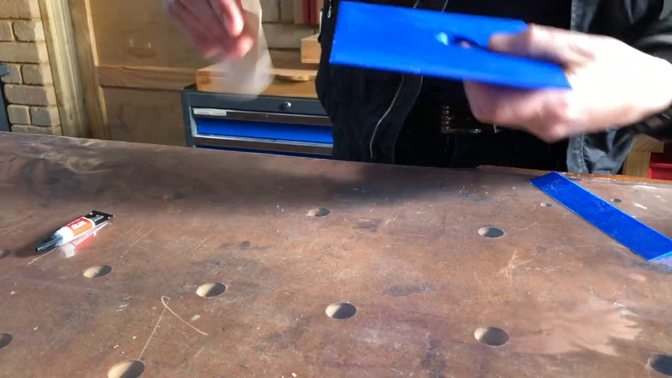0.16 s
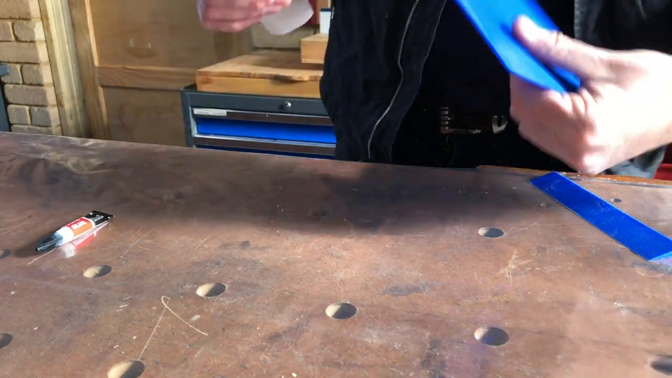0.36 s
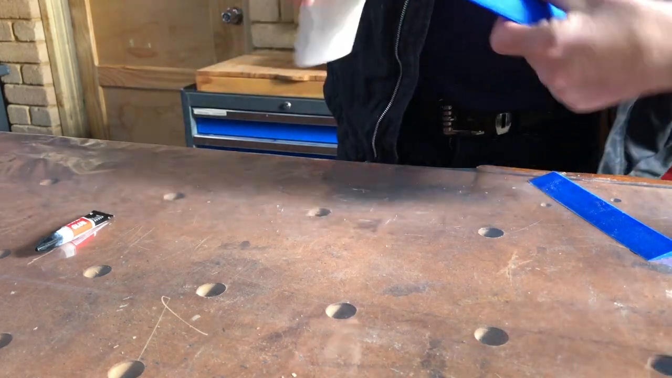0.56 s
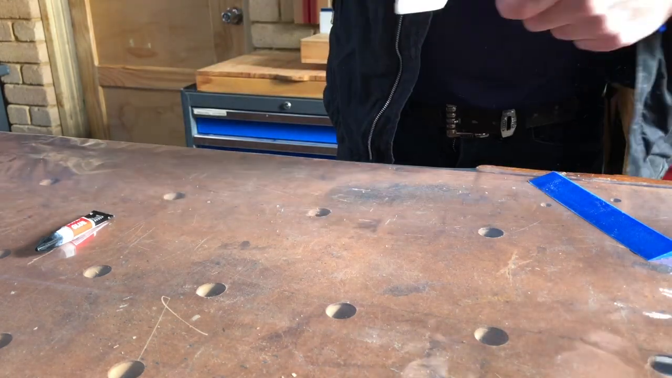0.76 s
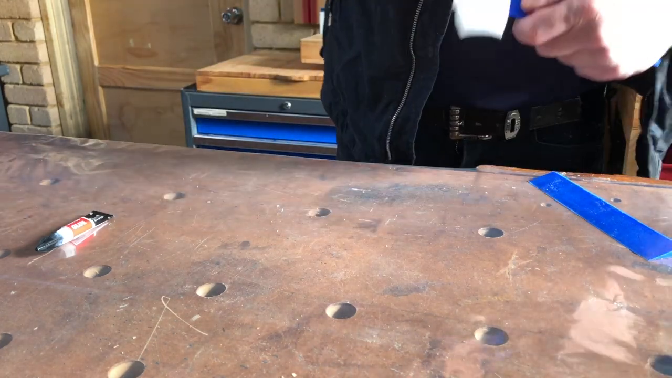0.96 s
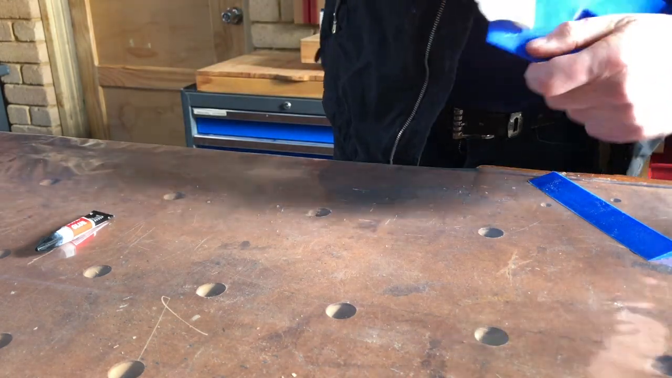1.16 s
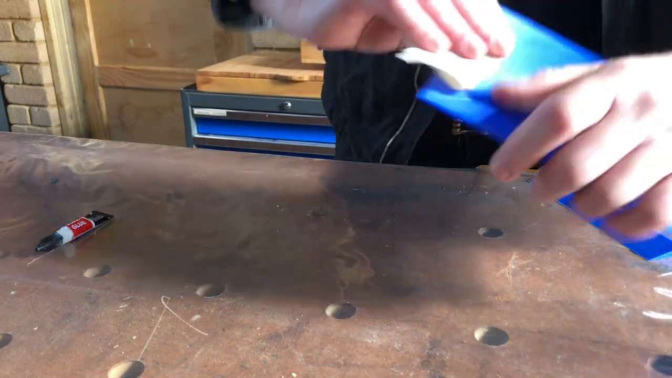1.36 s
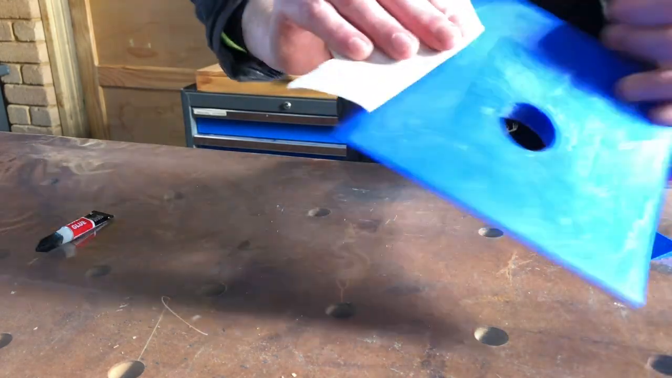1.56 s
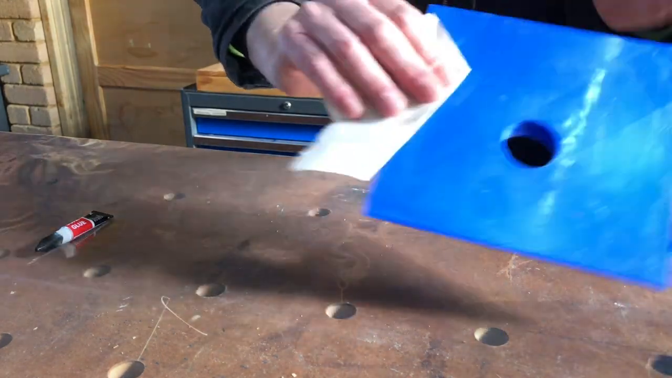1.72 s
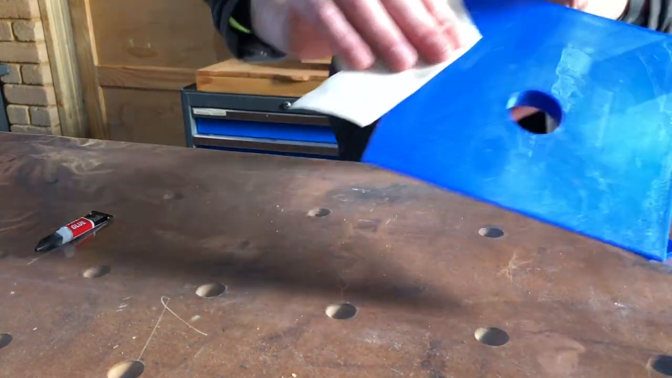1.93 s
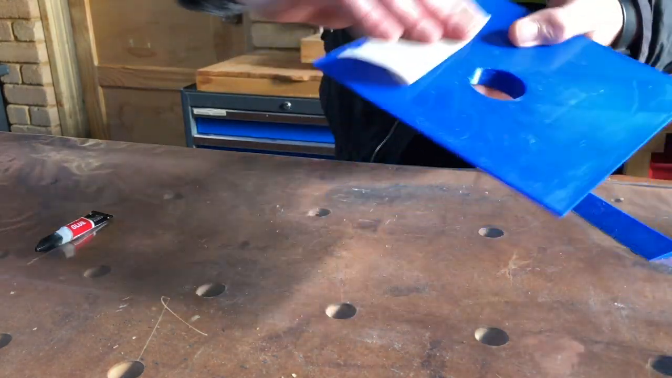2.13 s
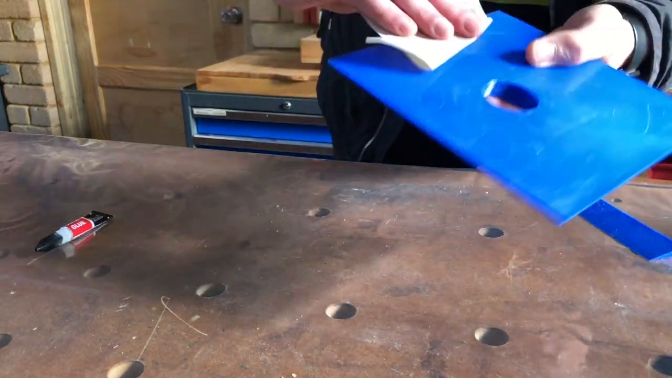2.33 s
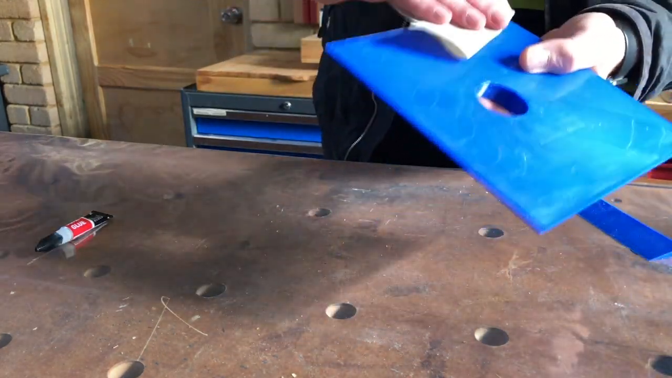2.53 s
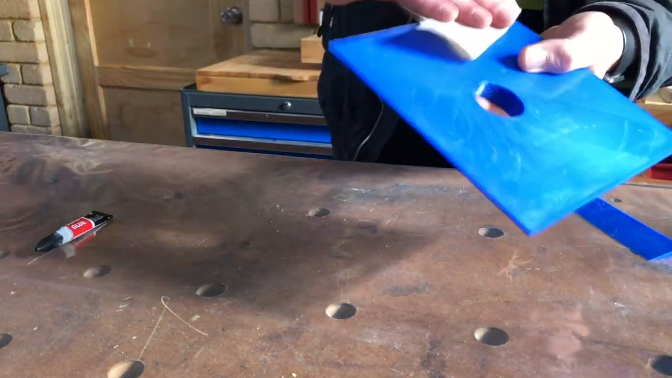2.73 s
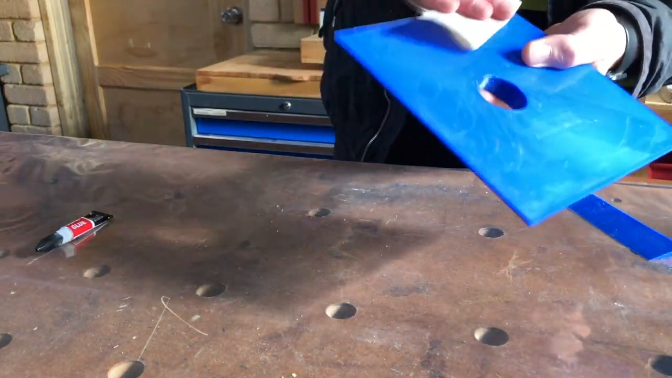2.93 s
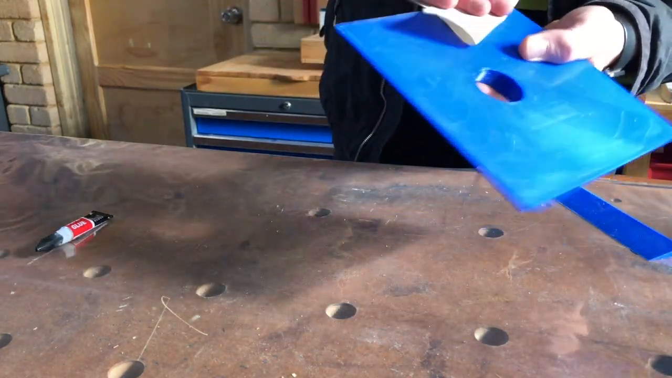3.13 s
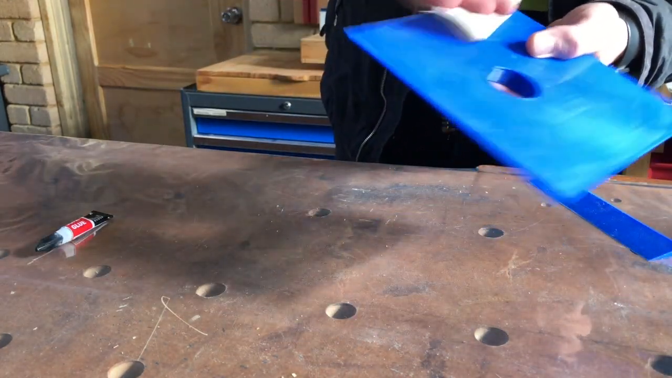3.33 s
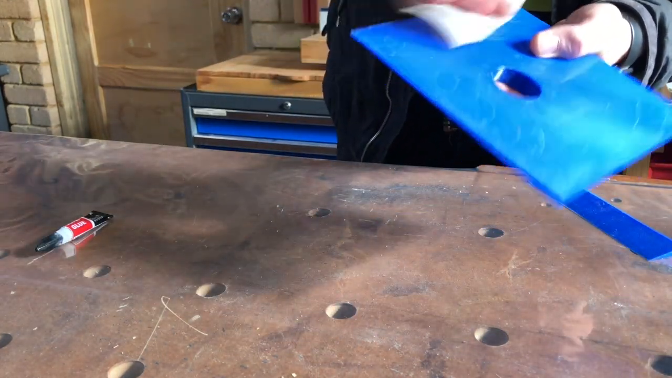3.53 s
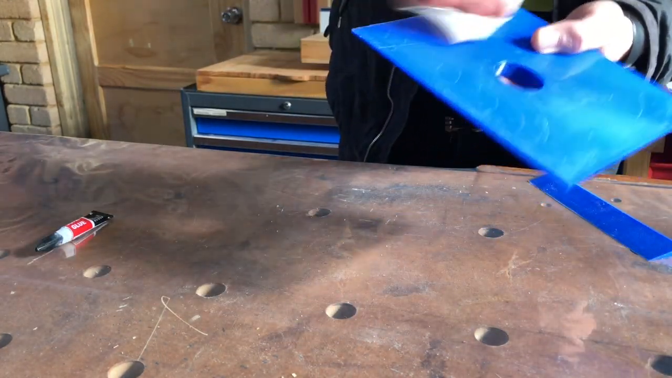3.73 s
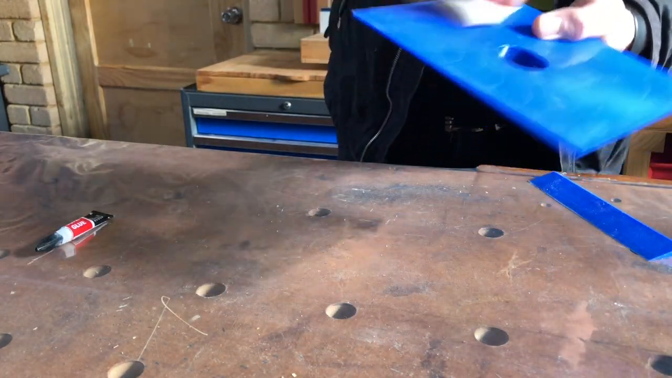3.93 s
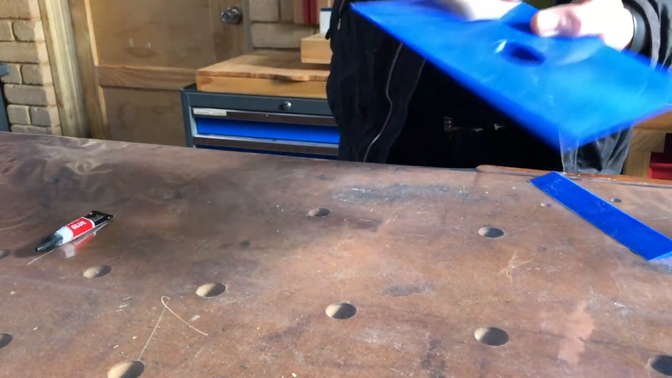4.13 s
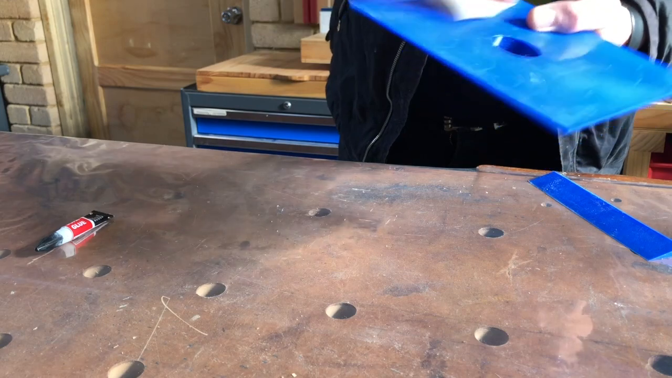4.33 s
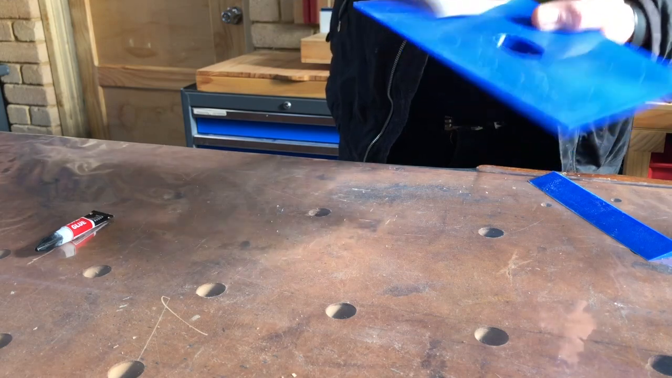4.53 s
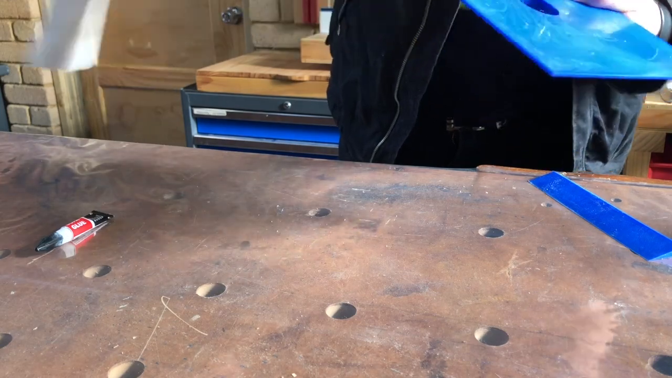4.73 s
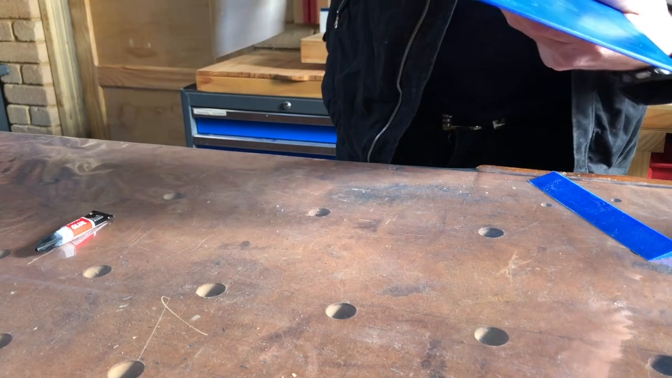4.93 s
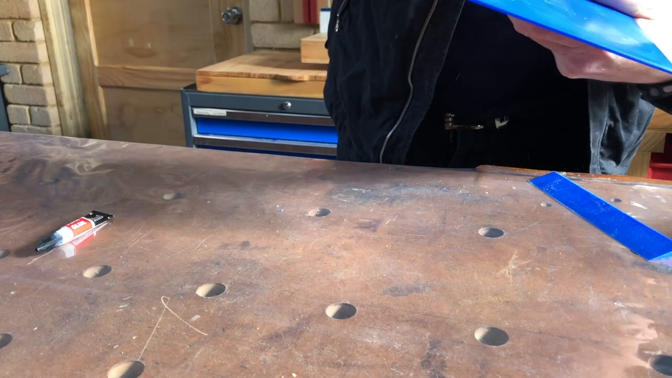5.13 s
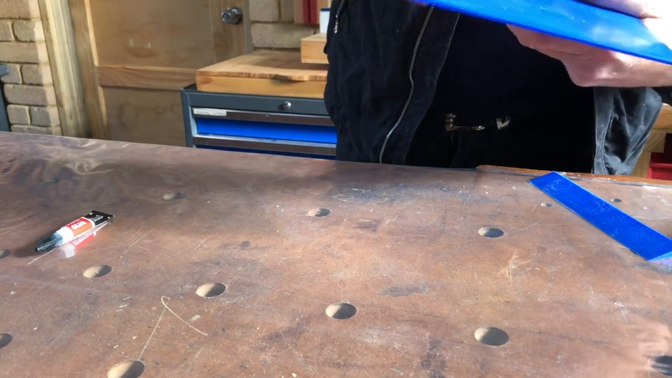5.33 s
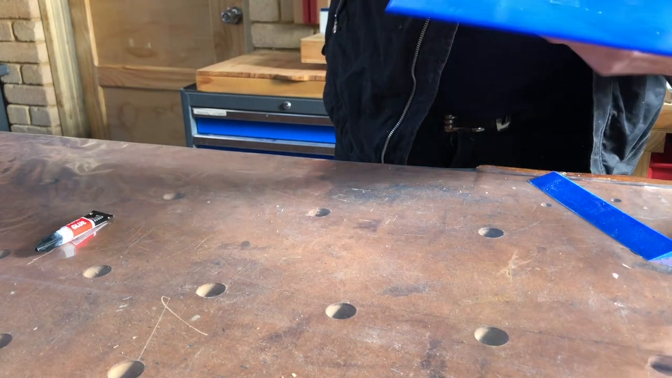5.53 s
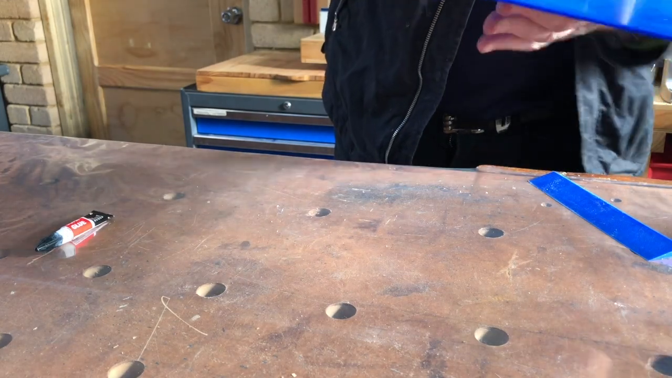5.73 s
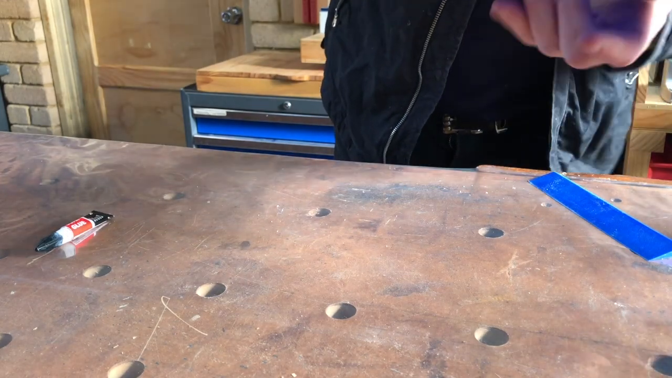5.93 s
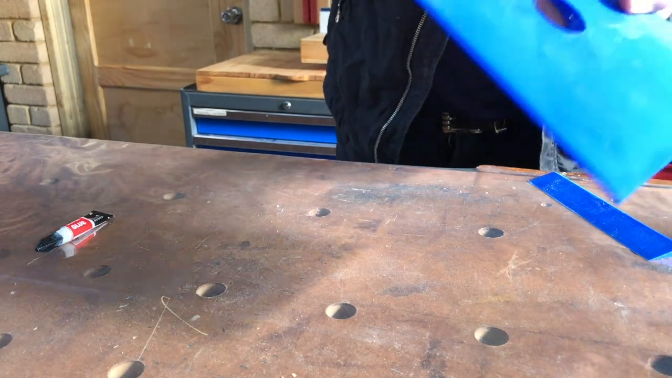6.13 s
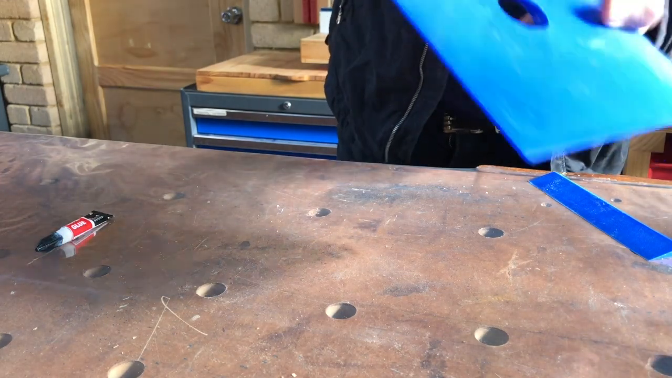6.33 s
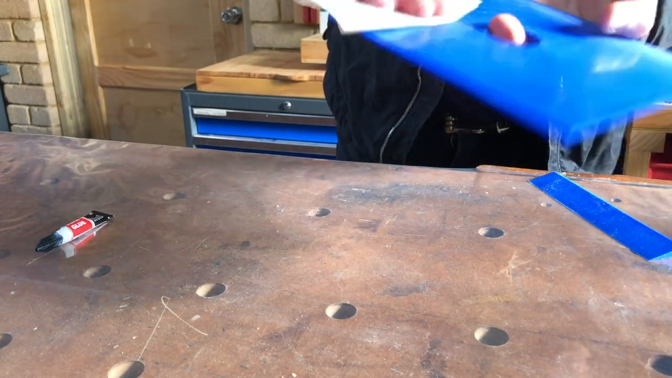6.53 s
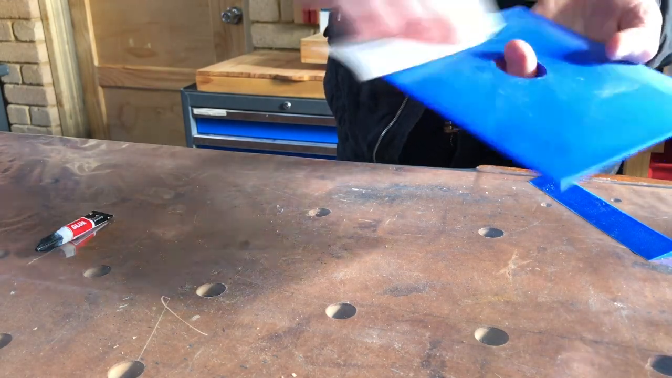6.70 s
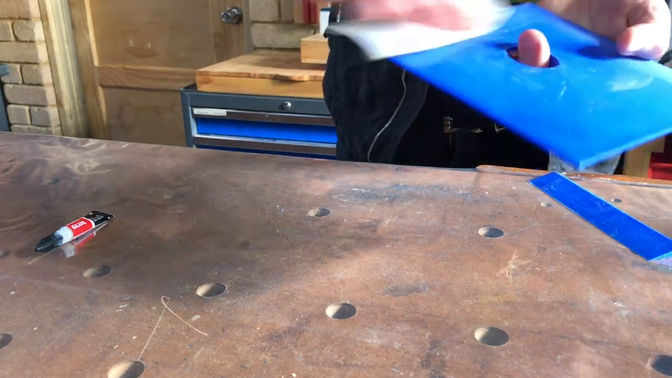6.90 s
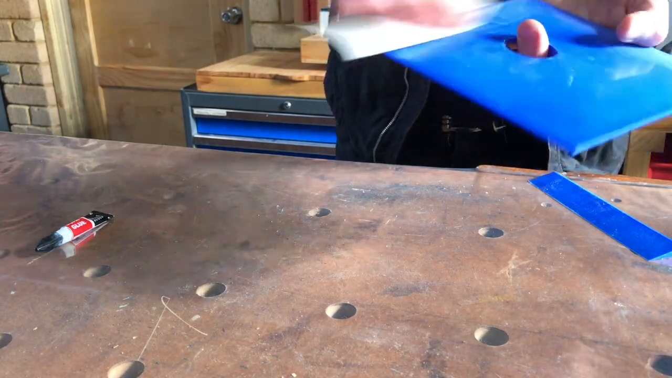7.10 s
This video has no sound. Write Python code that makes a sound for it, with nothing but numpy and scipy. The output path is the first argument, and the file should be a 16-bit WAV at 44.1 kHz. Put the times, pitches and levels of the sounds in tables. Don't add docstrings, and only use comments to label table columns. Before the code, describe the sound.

Sandpaper scrapes rapidly back and forth over a hard plastic plate, bright gritty hiss in quick strokes, with handling taps and pauses in a quiet workshop.

```python
import sys
import numpy as np
from scipy import signal
from scipy.fft import rfft, irfft
from scipy.io import wavfile
from scipy.ndimage import uniform_filter1d

SR = 44100
rng = np.random.default_rng(int(sys.argv[2]) if len(sys.argv) > 2 else 0)


def pcm_store(signal):
    levels = np.round(np.clip(np.atleast_2d(signal), -1, 1) * 32767)
    wavfile.write(sys.argv[1], SR, levels.astype(np.int16).T)


def field_ratio(decibels):
    return 10 ** (np.asarray(decibels, dtype=float) / 20)


N = 315756


def evened(x):
    return x / np.sqrt(np.mean(np.abs(x) ** 2) + 1e-20)


def drift(shape, size):
    return evened(uniform_filter1d(rng.standard_normal(shape), size=size))


def read(points, hz):
    f, value = np.transpose(points)
    return np.interp(np.log(hz + 1), np.log(f + 1), value)


def add(mix, s, sound):
    part = mix[round(s * SR):][:len(sound)]
    part += sound[:len(part)]


def highpass(x, order, hz):
    return signal.sosfilt(signal.butter(order, hz, "highpass", fs=SR, output="sos"), x)


def resonate(x, hz, width):
    turn = np.exp(2j * np.pi * np.cumsum(hz * np.ones(len(x))) / SR)
    r = np.exp(-np.pi * width / SR)
    return 2 * (turn * signal.lfilter([1 - r], [1, -r], x / turn + 1e-18)).real


def resonate_twice(x, hz, width):
    return resonate(resonate(x, hz, width), hz, width)


def colour(x, points, tilt_db=0.):
    hz = np.fft.rfftfreq(len(x), 1 / SR)
    gain = field_ratio(read(points, hz) + tilt_db * np.log2(hz / 5000 + 0.023))
    return evened(irfft(rfft(x) * gain, len(x)))


def grains(count, spread_db, clump_db):
    clumps = drift(count, 130)
    sizes = field_ratio(spread_db * rng.standard_normal(count) + clump_db * clumps)
    return evened(rng.standard_normal(count) * sizes)


# (frequency [Hz], level [dB], t60 [s])
PLATE = [(473, -4.5, 0.043), (577, -6.5, 0.047), (786, -4, 0.035), (910, -1, 0.051), (1380, -9.5, 0.017),
         (1687, -8.5, 0.087), (2124, -21, 0.047), (2700, -10.5, .02), (4320, -14, 0.006)]


def ring(x):
    modes = 0
    for hz, db, t60 in PLATE:
        width = np.log(1000) / np.pi / max(t60, .008)
        modes = modes + field_ratio(db) * resonate(x, hz, width)
    return evened(modes)


def fuzzy_bands(start, end, bands):
    slip = rng.standard_normal(round((end - start) * SR))
    sound = sum(field_ratio(db) * evened(resonate_twice(slip, hz, width)) for hz, width, db in bands)
    return start, sound * signal.windows.tukey(len(slip), .5)


def tap(row, shape):
    s, peak_db, hz, ring_db = row
    bright_db, t60, rise, snap, spread = shape
    t = np.arange(6000) / SR
    blow = rng.standard_normal(len(t)) * field_ratio(-60 * t / t60) * np.minimum(t / rise, 1) ** 2
    blow = blow + snap * (np.arange(len(t)) == round(rise * SR))
    thud = evened(resonate_twice(blow, hz, spread * hz))
    tick = evened(resonate_twice(blow, 6200, 10700))
    sound = thud + field_ratio(bright_db + 7.0) * tick + field_ratio(ring_db) * ring(blow)
    sound = highpass(sound, 2, hz / 4)
    return s, field_ratio(peak_db) * sound / np.abs(sound).max()


# (time [s], frequency [Hz], level [dB], second order level [dB])
MOTOR = [(0.0, 68.6, -71.5, -68), (0.24, 77.74, -64.5, -69), (0.3, 79.24, -74, -69.5),
         (0.74, 82.06, -70.5, -75.5), (1.17, 85.85, -62.5, -60), (1.56, 85.4, -72.5, -66),
         (2.27, 86.6, -62, -69.5), (2.41, 89.1, -72.5, -72.5), (4.09, 93.8, -75, -82),
         (4.25, 97.8, -76.5, -82), (4.46, 93.9, -79, -79), (4.93, 94.27, -75.5, -76),
         (5.06, 99, -66, -92.5), (5.14, 94.8, -74, -78), (6.38, 96.6, -66, -66.5),
         (6.62, 100, -88.5, -74.5), (6.82, 95.7, -73.5, -91), (7.16, 98.2, -73, -68)]


def motor():
    s, *columns = np.transpose(MOTOR)
    hz, first_db, second_db = (np.interp(np.arange(N) / SR, s, c) for c in columns)
    turns = np.cumsum(hz + 3.3 * drift(N, 3000)) / SR
    throb_db = 3 * evened(uniform_filter1d(drift((2, N), 3000), size=3000))
    first = field_ratio(first_db + throb_db[0]) * np.sin(2 * np.pi * turns)
    second = field_ratio(second_db - 2.0 + throb_db[1]) * np.sin(4 * np.pi * turns)
    return np.sqrt(2) * (first + second)


# (frequency [Hz], level [dB per Hz])
FLOOR = [(15, -69), (25, -45.5), (61, -10.5), (108, -3), (212, -9), (363, -10), (439, -9.5), (531, -11.5),
         (6050, -28), (14000, -30.5), (16000, -57.5)]


def room_floor():
    return [field_ratio(-70) * colour(noise, FLOOR) for noise in rng.standard_normal((2, N))]


def mottled(x, patch_db):
    z = signal.stft(x, nperseg=256, noverlap=192)[2]
    field = uniform_filter1d(rng.standard_normal(z.shape), size=5, axis=0)
    field = evened(uniform_filter1d(field, size=14, axis=1))
    return signal.istft(z * field_ratio(patch_db * field), nperseg=256, noverlap=192)[1][:len(x)]


# (frequency [Hz], level [dB per Hz])
GRIT = [(530, -53), (900, -55), (1410, -12), (1810, -13.5), (2470, -12), (2790, -5.5), (4250, -4.5),
        (5100, -1.5), (6180, -3), (7580, -0.5), (9090, -1), (11000, 3), (12400, -2), (14700, -1),
        (16000, -1)]


def grit_hiss(grit, tilt_db, speed):
    hiss = highpass(mottled(colour(grit, GRIT, tilt_db), patch_db=2.5), 4, 1350)
    dull = resonate(hiss, 2500, 5000)
    return dull + (hiss - dull) * speed / np.mean(speed)


def ridge_whistle(grit, speed, top_hz, ends):
    hz = top_hz * speed * (1 + 0.038 * drift(len(grit), 350))
    width = .55 * top_hz * ends ** 2
    first = evened(resonate_twice(grit, hz, width))
    octave = evened(resonate_twice(grit, 2 * hz, 2 * width))
    return 1.2 * (first + field_ratio(-8) * octave) * speed ** 2.5


# (frequency [Hz], level [dB per Hz])
DRUM = [(90, -46.5), (200, -22.5), (450, -14), (700, -8.5), (1000, -9.5), (1300, 0.5), (1800, -3),
        (2600, -7), (4000, -43.5)]


def stroke(row, grip, tilt_db, drum_db, ends):
    start, end, level_db, top_hz, top = row
    push_db, whistle_db, bite, release = grip
    u = np.linspace(0, 1, round((end - start) * SR))
    turn = np.where((u < top) == (push_db > 0), ends + .3 * (1 - ends), ends)
    swing = np.sin(np.pi / 2 * np.where(u < top, u / top, (1 - u) / (1 - top)))
    speed = turn + (1 - turn) * swing
    grit = grains(len(u), spread_db=1.0, clump_db=0.6)
    hiss = grit_hiss(grit, tilt_db, speed)
    catch_db = 3.5 * drift(len(u), 350) + 2.0 * np.tanh(push_db) * (u - 1.0)
    whistle = ridge_whistle(grit, speed, top_hz, ends) * field_ratio(whistle_db + catch_db)
    drumming = field_ratio(drum_db - 16.5) * colour(grit, DRUM)
    biting = np.sin(np.pi / 2 * np.minimum(u / bite, 1))
    easing = np.sin(np.pi / 2 * np.minimum((1 - u) / release, 1))
    pressure = field_ratio(level_db + 0.5 + push_db / 2 * np.tanh(3.5 * (u - .48)))
    return start, pressure * (biting * easing) ** 0.72 * (hiss + whistle + drumming)


# (time [s], brightness [dB per octave])
SETTLE = [(0, -4.5), (.87, -7.5), (1, -3), (1.3, -4), (1.62, -7.5), (2.2, -5), (2.45, -3), (2.85, -1.6),
          (3.3, -1.09), (3.5, -3), (3.8, -1.41), (4.6, -1.5), (6.41, -5), (6.63, -1), (7.1, -0.3)]


def settle(s):
    tilt_db = np.interp(s, *np.transpose(SETTLE))
    return tilt_db, -2 * tilt_db


# (start [s], end [s], level [dB], ridges crossed at top speed [Hz], moment of top speed [0-1])
EARLIER_BOUT = [
    (0, .1, -32.5, 4300, 0.62),
]
TRIES = [
    (.818, 0.917, -34.5, 3500, 0.55),
    (0.944, 1.064, -29.5, 3700, 0.7),
    (1.083, 1.184, -30.5, 3900, 0.17),
    (1.218, 1.253, -35.5, 3100, 0.35),
    (1.272, 1.343, -56, 2810, 0.28),
    (1.585, 1.652, -32.5, 3150, 0.1),
    (2.007, 2.15, -33.5, 3200, .4),
    (2.15, 2.267, -33.5, 2900, 0.32),
    (6.36, 6.456, -31, 4220, 0.51),
]
LONG_BOUT = [(2.294, 2.371, -28.5, 1730, 0.47), (2.392, 2.473, -29, 1600, 0.51),
             (2.489, 2.576, -27.5, 2680, 0.5), (2.596, 2.686, -27.5, 2548, 0.45),
             (2.691, 2.78, -27.5, 2606, 0.55), (2.798, 2.893, -28, 3182, 0.62),
             (2.892, 2.98, -27, 3127, 0.56), (2.999, 3.083, -28, 3038, 0.3),
             (3.088, 3.171, -27.5, 3204, 0.59), (3.186, 3.267, -27.5, 3450, 0.36),
             (3.278, 3.357, -26, 3570, 0.57), (3.375, 3.464, -29.5, 3660, 0.46),
             (3.466, 3.551, -30, 3545, 0.6), (3.561, 3.658, -29.5, 3440, 0.43),
             (3.658, 3.752, -27.5, 3650, 0.48), (3.764, 3.856, -28.5, 3530, 0.46),
             (3.856, 3.956, -28, 4061, 0.5), (3.962, 4.052, -27.5, 3640, 0.51),
             (4.06, 4.157, -28.5, 4234, 0.56), (4.165, 4.252, -28, 3829, 0.55),
             (4.261, 4.346, -27, 4046, 0.58), (4.36, 4.452, -28, 3700, .4), (4.451, 4.541, -28, 3535, 0.64),
             (4.554, 4.648, -27, 4850, 0.72)]
LAST_BOUT = [
    (6.477, 6.598, -30, 2700, .7),
    (6.594, 6.678, -26, 2610, 0.55),
    (6.694, 6.786, -27.5, 2900, 0.58),
    (6.789, 6.883, -28, 2970, 0.14),
    (6.898, 6.983, -27, 2930, 0.467),
    (6.993, 7.076, -27.5, 2700, 0.46),
    (7.095, 7.177, -27.5, 2783, 0.9),
]
# (pressure gain [dB], whistle level [dB], bite [0-1], release [0-1])
EARLIER_GRIP = [(-5, -12.5, .03, .3)]
TRY_GRIP = [(-7, -11.5, 0.29, 0.26), (-1, -22, 0.14, 0.32), (-0.5, -16, 0.23, 0.34),
            (-2.5, -18.5, 0.45, 0.33), (-4, -2.5, .2, 0.36), (-2.5, -18, 0.29, 0.29), (-2, -25, 0.13, 0.32),
            (-3, -20, .12, 0.22), (-1.5, -15, 0.31, 0.26)]
LONG_GRIP = [(-4, -23.5, 0.19, 0.099), (2, -21.5, .12, 0.34), (2, -21, 0.26, .1), (-5.5, -15.5, 0.097, .3),
             (-0.5, -16, .2, 0.084), (-5, -11, .1, .3), (3.5, -13.5, 0.16, 0.18), (-6.5, -14, 0.072, 0.21),
             (4, -10, 0.24, 0.184), (-2, -13, .14, 0.21), (0.5, -12, 0.28, .12), (-7, -11, .12, .25),
             (0.5, -8.5, 0.28, .15), (-4, -12.5, .12, .2), (0, -13, .25, 0.11), (-5, -13, 0.092, .25),
             (-1.5, -12.5, 0.37, .12), (-5, -13.5, 0.14, 0.12), (2.5, -7.5, 0.11, 0.068),
             (-7.5, -12, 0.15, 0.27), (-1, -15, 0.3, .12), (-6.5, -14.5, 0.17, 0.25), (4, -13.5, 0.18, .1),
             (-1, -12, 0.14, .15)]
LAST_GRIP = [(-5.5, -22, 0.17, 0.304), (0.5, -24, .3, 0.257), (-2, -19, 0.13, 0.257), (1, -18, 0.152, 0.17),
             (-2.5, -25.5, 0.113, .2), (-0.5, -19.5, 0.09, 0.15), (-1.5, -23.5, .08, .1)]
# (speed at the turns [0-1], drumming level [dB])
EARLIER_STYLE = (0.54, -5)
TRY_STYLE = (0.63, -6.5)
LONG_STYLE = (.41, -12)
LAST_STYLE = (0.736, -10)


def strokes():
    bouts = ((EARLIER_BOUT, EARLIER_GRIP, EARLIER_STYLE), (TRIES, TRY_GRIP, TRY_STYLE),
             (LONG_BOUT, LONG_GRIP, LONG_STYLE), (LAST_BOUT, LAST_GRIP, LAST_STYLE))
    for bout, grips, (ends, drum_db) in bouts:
        for row, grip in zip(bout, grips):
            tilt_db, loose_db = settle((row[0] + row[1]) / 2)
            yield stroke(row, grip, tilt_db, drum_db + loose_db, ends)


# (time [s], level [dB])
CATCHES = [(.008, 4), (.05, 1), (.064, 4.5), (.082, -12), (1.6, 1), (1.633, -1), (1.639, 1.5), (2.17, 1),
           (2.325, -1), (2.413, 1.5), (2.435, -1), (2.72, -2), (2.75, 3), (3.014, 0.5), (3.2, 2),
           (3.296, -1), (3.306, -3.5), (3.335, 0.5), (3.391, 2.5), (3.417, 1), (3.575, 2.5), (3.715, 2.5),
           (3.779, 2.5), (3.9, -1.5), (3.915, 4.5), (4.105, -2), (4.115, 3), (4.189, 0), (4.295, -1.5),
           (4.47, 2), (4.5, -0.5), (6.376, 4.5), (6.397, 4), (6.911, 0.5), (7.06, 2.5), (7.108, 2.5)]


def catches():
    db = np.zeros(N)
    bell = np.exp(-(np.arange(-900, 900) / SR / 0.0039) ** 2 / 2)
    for s, size_db in CATCHES:
        add(db, s, size_db * bell)
    return field_ratio(np.roll(db, -900))


# (time [s], peak level [dB], centre [Hz], plate ring level [dB])
BUMPS = [(.079, -22.5, 4000, -3), (1.411, -37.5, 940, -10), (1.427, -34, 1800, 3.5), (1.64, -33, 747, -8),
         (1.993, -32.5, 229.8, -4), (4.635, -38.5, 473, 5), (4.683, -46, 620, -10), (5.165, -39, 1900, -12),
         (5.298, -48, 726, -8), (5.885, -48, 450, 5), (5.905, -45.5, 1780, -4.5), (6.222, -38, 494, -10.5),
         (6.221, -35.5, 1770, 2), (6.223, -42, 870, -0.5), (6.229, -42, 4470, -22), (6.47, -29.5, 1248, -8),
         (7.059, -37, 720, -24)]
# (brightness [dB], t60 [s], rise [s], snap [ratio], spread [ratio])
BUMP = (-17, .034, .016, .1, .6)


def bumps():
    return [tap(row, BUMP) for row in BUMPS]


# (start [s], end [s], level [dB], brightness [dB per octave], ring level [dB])
SLIDES = [(.08, 0.2454, -51, 1.5, -3), (.2, 0.88, -57, 1.9, -3), (0.351, 0.407, -53.5, 1.5, -23),
          (0.539, 0.73, -58, -8.5, 0), (1.269, 1.361, -55.5, -7, 2.5), (1.345, 1.65, -56.5, -12, 0),
          (1.4, 2.2, -67, -6.5, -13), (1.72, 1.806, -68.5, -7.5, -11), (5.029, 5.19, -60.5, 3, -16.5),
          (5.19, 5.266, -65.5, 3, -13.5), (5.271, 5.696, -76, 1.5, -13.5), (6.253, 6.288, -65.5, 3.5, -14),
          (5.7, 5.9, -64, 0.5, -4), (5.869, 5.951, -54.5, 0.5, 0.5), (1.899, 1.913, -40.5, 1.5, -10),
          (1.42, 1.455, -48, -1, -8), (5.3, 5.322, -50, 0, -7), (6.226, 6.248, -48, 0, -7),
          (1.543, 1.559, -43, 1.5, -12), (6.347, 6.368, -38, 2, -10), (5.932, 6.07, -62, 2, -8),
          (6.043, 6.13, -55.5, 1.4, -9)]
# (frequency [Hz], level [dB per Hz])
SLIDE = [(180, -18.5), (300, -3.5), (478, -9), (856, -12.5), (961, -10.5), (1210, -6.5), (4670, -9.5),
         (12500, -18), (16000, -21.5)]


def slides():
    for start, end, level_db, bright_db, ring_db in SLIDES:
        skin = colour(grains(round((end - start) * SR), spread_db=0.8, clump_db=3.5), SLIDE)
        dull = resonate(skin, 970, 2900)
        sound = dull + field_ratio(3.3 * bright_db) * (skin - dull) + field_ratio(ring_db) * ring(skin)
        yield start, field_ratio(level_db - 6.5) * sound * signal.windows.tukey(len(skin), 0.44)


# (frequency [Hz], width [Hz], level [dB])
DRAG = [(1600, 200, -63.5), (2630, 240, -65.5), (515, 124, -72.5)]
# (start [s], end [s])
DRAG_SPAN = (0.11, 0.89)


def paper_drag():
    return fuzzy_bands(*DRAG_SPAN, DRAG)


# (start [s], end [s], frequency [Hz], width [Hz], level [dB])
HUMS = [(.995, 1.062, 960, 250, -51), (1.085, 1.135, 1010, 220, -51), (.205, 0.253, 1640, 200, -60),
        (6.222, 6.25, 1820, 102, -50), (6.224, 6.258, 480, 97, -51.5), (6.224, 6.25, 880, 150, -53.5),
        (1.408, 1.428, 905, 120, -49), (1.42, 1.452, 1780, 250, -51), (5.165, 5.186, 1867, 670, -55),
        (5.301, 5.322, 1420, 214, -59.5), (4.932, 4.945, 240, 150, -60), (.835, .895, 3450, 300, -42),
        (1.085, 1.125, 4400, 300, -40), (6.37, 6.43, 3100, 650, -42), (5.893, 5.965, 1790, 72, -58.5),
        (5.85, 5.875, 1200, 165, -66.5), (5.92, 5.945, 2400, 150, -65), (1.595, 1.635, 4600, 1200, -39),
        (2.3, 2.365, 6000, 500, -36), (2.4, 2.46, 3300, 500, -41)]


def hums():
    return [fuzzy_bands(start, end, [band]) for start, end, *band in HUMS]


# (time [s], peak level [dB], centre [Hz], plate ring level [dB])
KNOCKS = [(.522, -40, 1610, 7), (.579, -28, 2440, -7.5), (.81, -18.5, 2680, -4), (1.368, -37, 928, -19),
          (1.718, -31, 1170, -0.5), (1.769, -34, 1070, 15), (1.897, -20.5, 2200, -18),
          (5.036, -28, 2724, -5), (5.059, -34, 2600, 2), (5.823, -51, 842, 0.5), (6.066, -37, 1693, -10.5)]
# (brightness [dB], t60 [s], rise [s], snap [ratio], spread [ratio])
KNOCK = (-14, .01, .0005, 16, .7)


def knocks():
    return [tap(row, KNOCK) for row in KNOCKS]


# (time [s], peak level [dB], centre [Hz], plate ring level [dB])
TICKS = [(.564, -30.5, 2900, -22), (.706, -34, 2691, -12.5), (.762, -35, 2185, -15.5), (1.194, -28, 910, 5),
         (1.282, -33, 2930, -16), (1.295, -30, 2810, -12), (1.547, -25.5, 1100, -8.5),
         (1.551, -33, 3080, -13.5), (5.147, -46, 1640, -14.5), (5.48, -40, 4800, -12), (5.516, -44, 910, 7),
         (5.953, -44.5, 1739, -11.5), (5.988, -40, 4130, -6.5), (6.044, -42.5, 840, -13.5),
         (6.105, -28.5, 2341, 0), (6.217, -43, 4500, -20), (6.348, -34, 4110, -12), (6.366, -25, 2585, -8)]
# (brightness [dB], t60 [s], rise [s], snap [ratio], spread [ratio])
TICK = (1, 0.0276, 0.0016, 3.12, 1.06)


def ticks():
    return [tap(row, TICK) for row in TICKS]


# (time [s], peak level [dB], centre [Hz], plate ring level [dB])
THUMPS = [
    (4.934, -49, 220, -25),
    (5.059, -47.5, 350, -20),
    (5.5, -43.5, 672, -20),
]
# (brightness [dB], t60 [s], rise [s], snap [ratio], spread [ratio])
THUMP = (-40, .012, .0012, 12, 1.1)


def thumps():
    return [tap(row, THUMP) for row in THUMPS]


# (frequency [Hz], width [Hz], level [dB])
SQUEAK = [(1248, 102, -67.5), (3650, 260, -77), (6105, 420, -72)]
# (start [s], end [s])
SQUEAK_SPAN = (5.555, 5.635)


def thumb_squeak():
    return fuzzy_bands(*SQUEAK_SPAN, SQUEAK)


# (frequency [Hz], t60 [s])
SHOP = [(250, 0.71), (660, 0.73), (1740, 0.72), (4590, 0.53), (10000, 0.47), (15500, 0.31)]


def shop(x):
    taps = np.zeros((6, SR // 2))
    at = np.arange(200, SR // 2 - 20, 20) + rng.integers(0, 20, (6, (SR // 2 - 201) // 20))
    np.put_along_axis(taps, at, rng.choice([-1., 1.], at.shape), 1)
    hz, t, z = signal.stft(taps, SR, nperseg=256)
    decay = field_ratio(-60 * t / read(SHOP, hz)[:, None])
    tail = signal.istft(z * decay, SR, nperseg=256)[1]
    turn = 2 * np.pi * (61 * np.arange(N) / SR + np.arange(6)[:, None] / 3)
    feed = np.sqrt(2 / 3) * np.cos(turn) * x
    wet = signal.oaconvolve(feed, tail / np.linalg.norm(tail[0]), axes=1)[:, :N]
    return wet.reshape(2, 3, N).sum(1)


# (frequency [Hz], left minus right level [dB])
LEAN = [(60, 1.27), (180, 1.14), (550, 0.5), (1650, 0.12), (4970, 2), (15000, -3)]
# (frequency [Hz], level below the common sound [dB])
APART = [(60, -16.5), (160, -23.5), (450, -16), (1000, -13.5), (2000, -19.5), (4000, -21), (6500, -17.5),
         (8700, -9.5), (11500, -15.5), (15000, -27.5)]


def ports(front_and_flank):
    hz = np.fft.rfftfreq(N, 1 / SR)
    front, flank = rfft(front_and_flank)
    lean = field_ratio(read(LEAN, hz) / 2)
    other = field_ratio(read(APART, hz)) * flank
    return irfft([(front + other) * lean, (front - other) / lean], N)


def scene():
    hands = np.zeros(N)
    for start, sound in strokes():
        add(hands, start, sound)
    hands = hands * catches()
    rubbing = hands.copy()
    touches = (*bumps(), *slides(), paper_drag(), *hums(), *knocks(), *ticks(), *thumps(), thumb_squeak())
    for start, sound in touches:
        add(hands, start, sound)
    tails = shop(rubbing + field_ratio(-4.5) * (hands - rubbing))
    floor = room_floor()
    front = hands + field_ratio(-9) * tails[0] + floor[0] + motor()
    bench = np.roll(hands, 130)
    flank = 0.73 * bench + field_ratio(-4.5) * tails[1] + field_ratio(6) * floor[1]
    return ports(np.array([front, flank]))


def top_cut(x):
    return signal.sosfilt(signal.butter(12, 17080, fs=SR, output="sos"), x)


def record(dry):
    cut = highpass(dry, 2, 45)
    lowpass = signal.firwin(511, 15900, window=("kaiser", 9), fs=SR)
    limited = signal.oaconvolve(cut, lowpass[None], "same")
    return top_cut(limited)


dry = scene()
out = record(dry)
pcm_store(out)
```